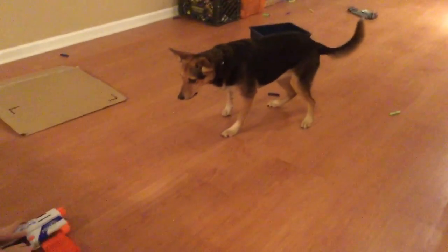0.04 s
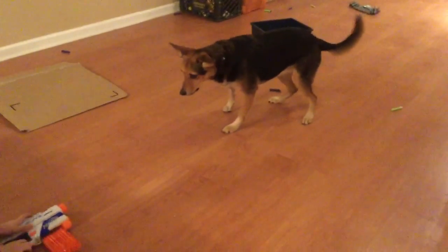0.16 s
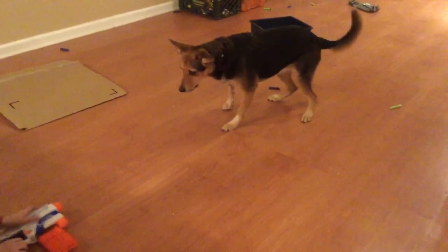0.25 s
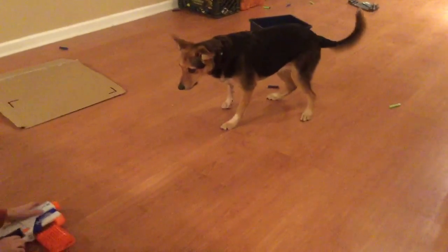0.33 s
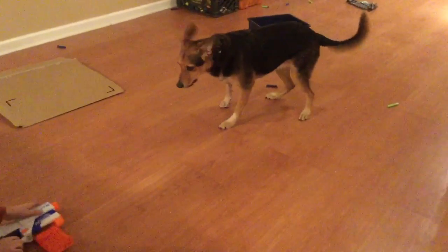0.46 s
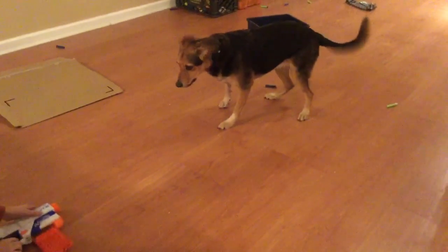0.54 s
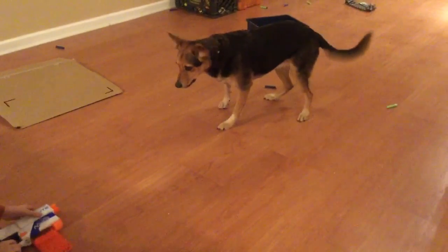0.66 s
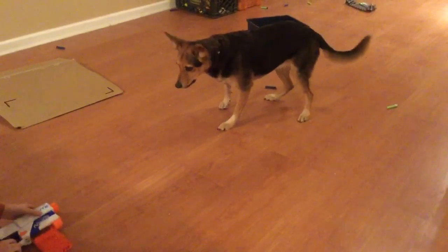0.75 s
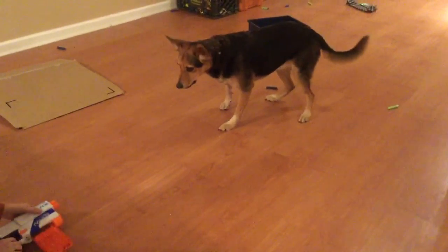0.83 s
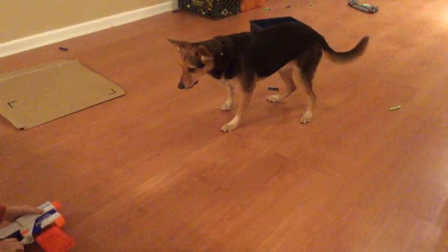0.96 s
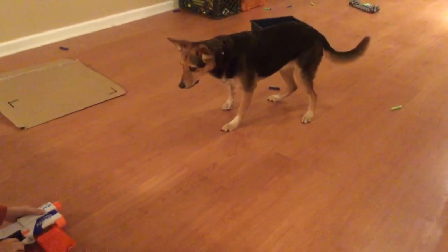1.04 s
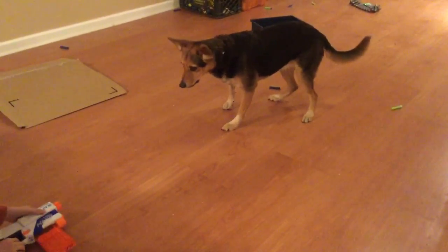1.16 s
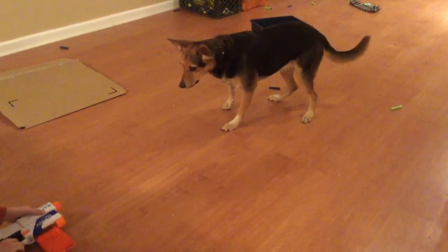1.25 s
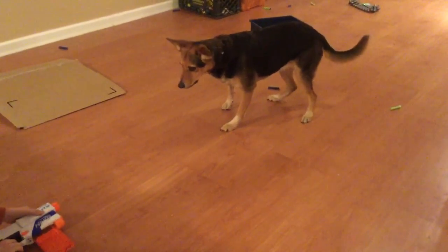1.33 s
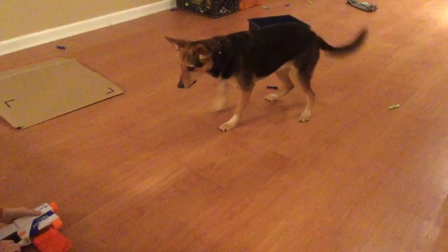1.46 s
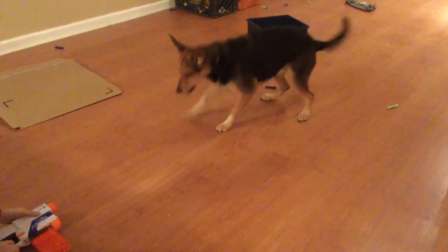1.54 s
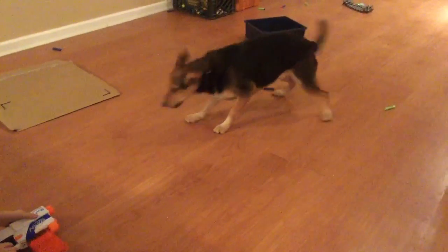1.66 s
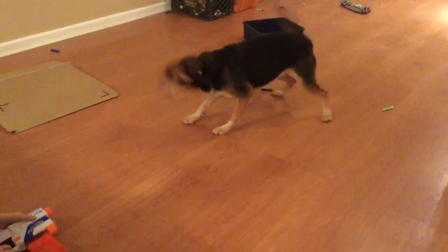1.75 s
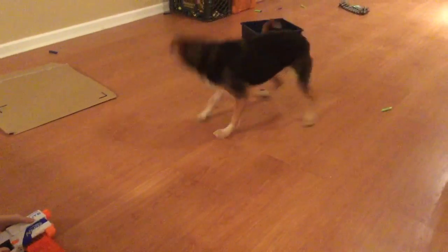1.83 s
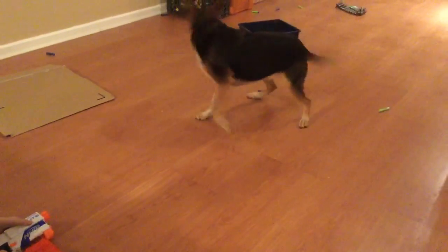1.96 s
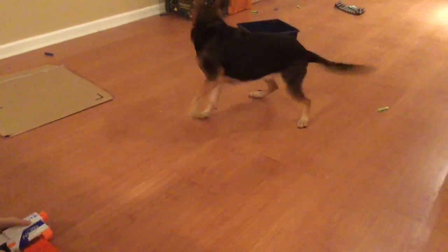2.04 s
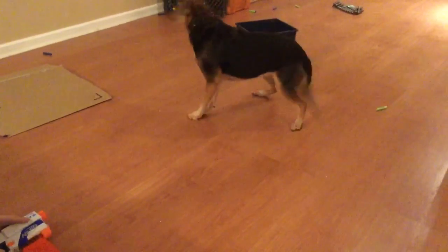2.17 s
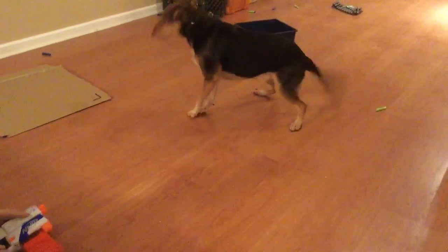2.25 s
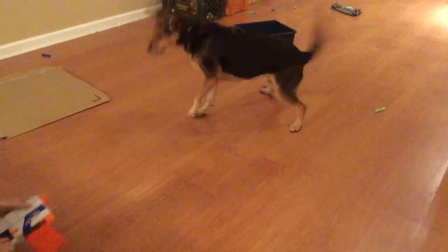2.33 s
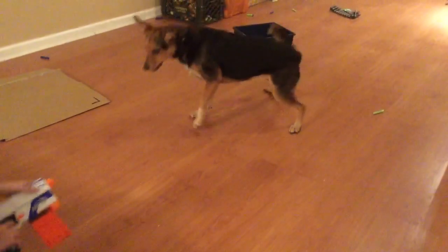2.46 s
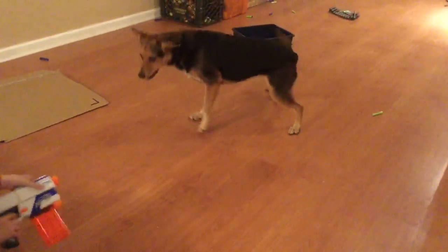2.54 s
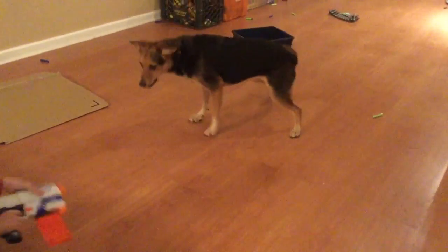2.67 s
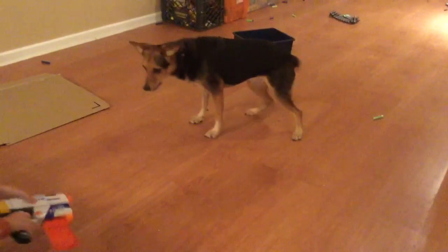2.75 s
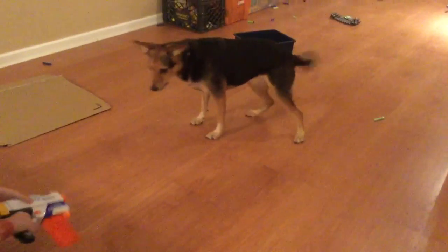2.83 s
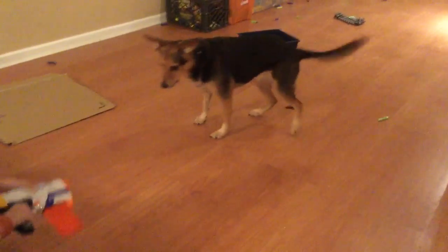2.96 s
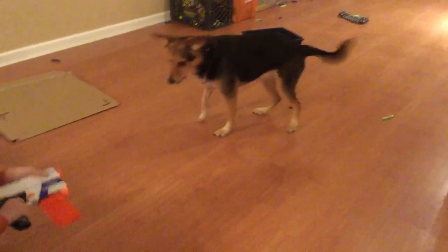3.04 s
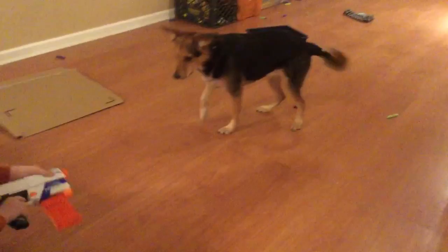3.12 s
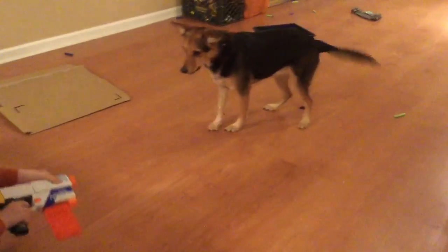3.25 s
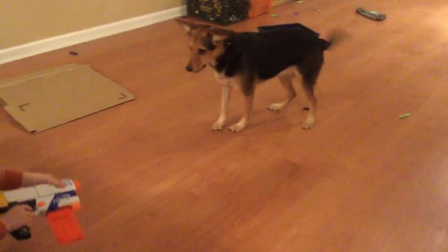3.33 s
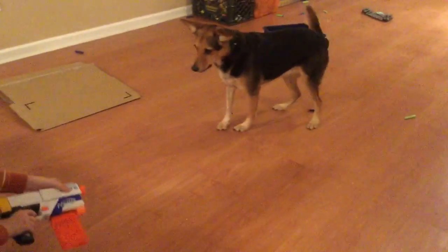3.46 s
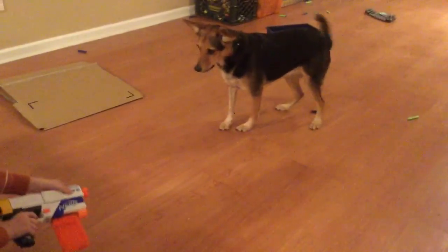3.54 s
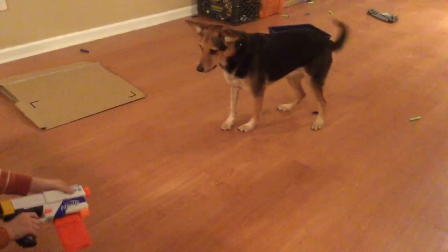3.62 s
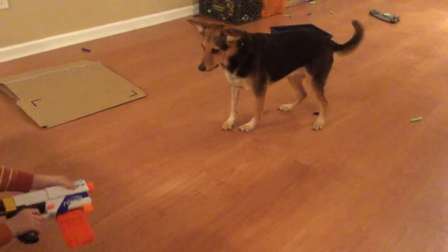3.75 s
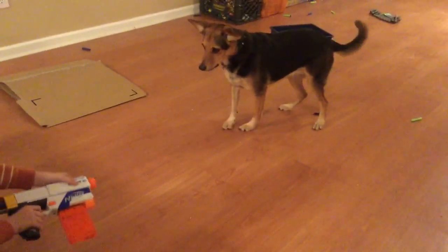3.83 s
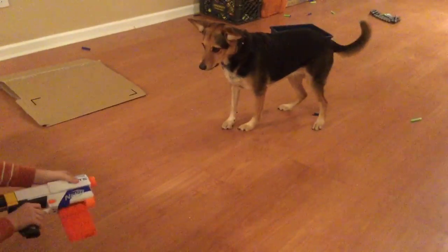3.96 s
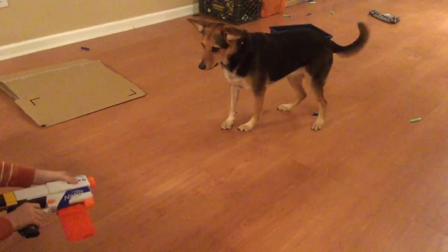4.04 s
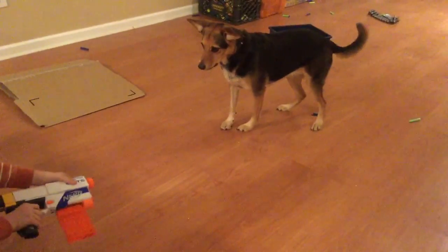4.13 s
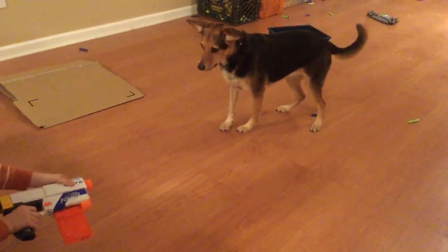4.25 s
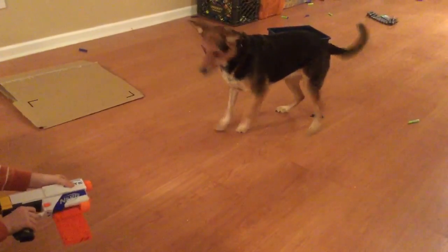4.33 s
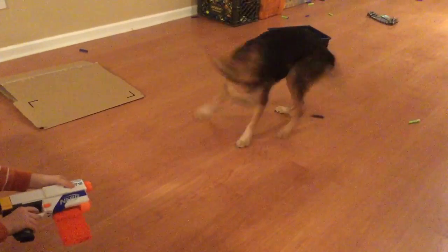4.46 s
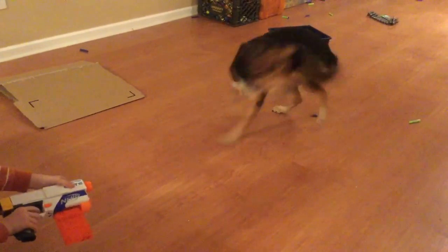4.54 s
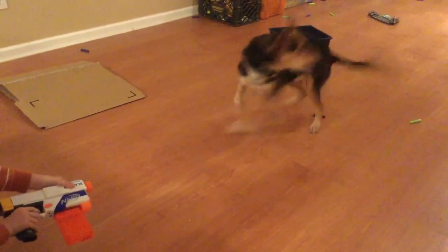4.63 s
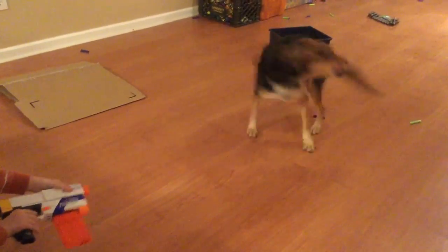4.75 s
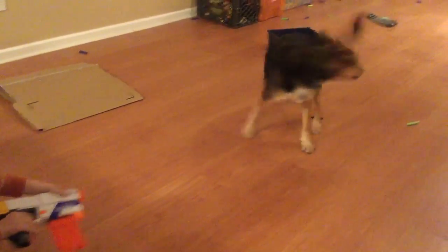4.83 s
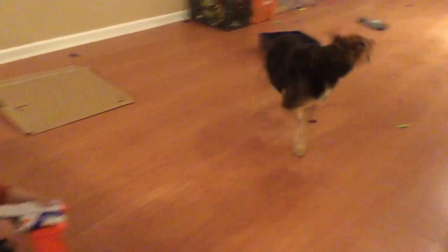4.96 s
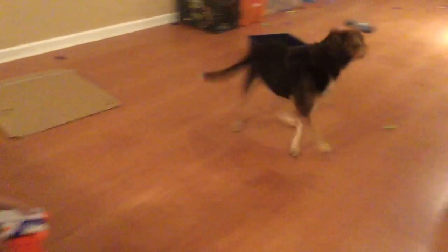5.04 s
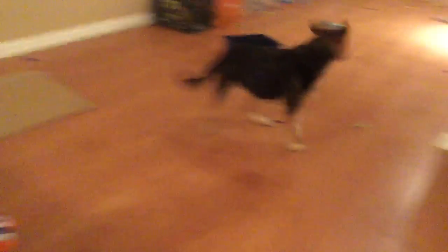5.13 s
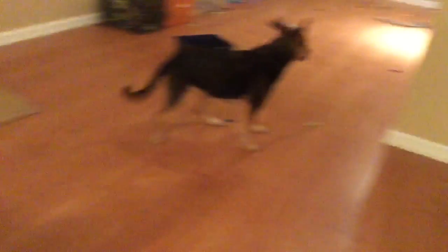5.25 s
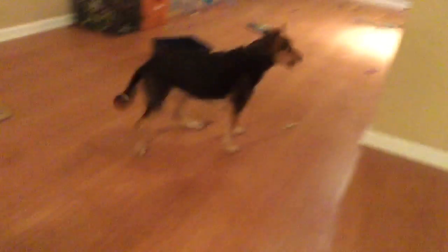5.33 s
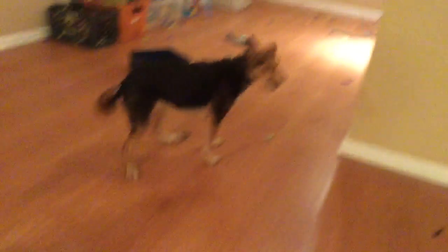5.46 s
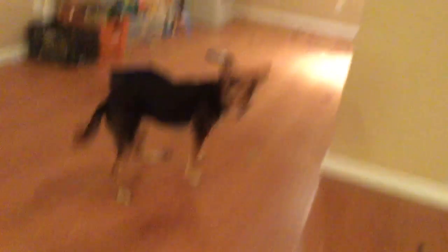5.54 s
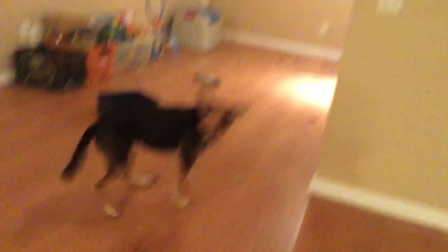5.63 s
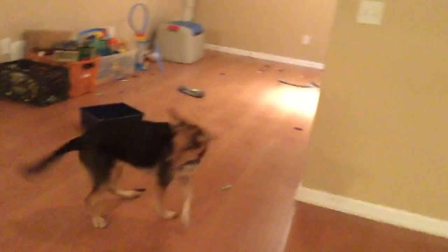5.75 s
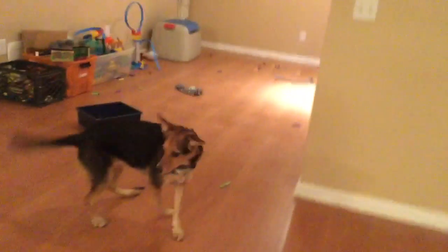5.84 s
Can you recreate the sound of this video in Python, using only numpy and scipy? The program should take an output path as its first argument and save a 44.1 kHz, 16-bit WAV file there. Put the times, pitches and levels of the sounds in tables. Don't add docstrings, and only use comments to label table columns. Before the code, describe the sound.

Near the microphone, ratchet clicks and a sliding scrape, then a hollow pop; across the room a dog answers with two rapid yelping barks. After more clattering and a quiet gap, a second, louder pop brings paw scuffs and another pair of barks, then closed-mouth huffs and claw ticks. Hard-floor reverberation, faint hiss, low rumble and handling bumps; barks slightly distorted.

```python
import sys
import numpy as np
from scipy import signal
from scipy.fft import rfft, irfft
from scipy.io import wavfile
from scipy.ndimage import uniform_filter1d

SR = 44100
rng = np.random.default_rng(int(sys.argv[2]) if len(sys.argv) > 2 else 0)


def dump(signal):
    limited = np.clip(np.atleast_2d(signal).T, -1, 1)
    pcm = np.round(limited * 32767).astype(np.int16)
    wavfile.write(sys.argv[1], SR, pcm)


def gain_from_db(level_db):
    decades = np.asarray(level_db, float) / 20
    return 10 ** decades


N = 259749
T = np.arange(N) / SR

# (t/s, level/dB, rise/s, fall/s)
MURMURS = [(0.001, -59, .01, 0.57), (.406, -58, 0.033, 0.33), (1.04, -69.5, 0.6, 0.2),
           (1.419, -70.5, 0.066, -1.5), (1.68, -43, 0.078, 1), (3.07, -51.5, 0.023, 0.12),
           (3.6, -78, .5, 0.48), (4.03, -67, 0.1, -0.9), (4.3, -54, .2, 0), (4.532, -41, 0.099, 0.23),
           (4.7, -56, 0.033, 3), (5.88, -47, 0.056, 3)]
# (t/s, level/dB, rise/s, fall/s)
DRONE = [
    (0.001, -55, .01, 0.47),
    (.65, -68, .3, 0.17),
    (1.05, -67.5, .5, .5),
]
# (t/s, level/dB, half-width/s)
BUMPS = [(.01, -46, 0.034), (.18, -70, .12), (.43, -61, 0.054), (1.488, -50, 0.048), (1.709, -46.5, 0.046),
         (1.85, -61, 0.021), (1.93, -56, 0.019), (2.24, -49, 0.018), (2.87, -71, 0.033), (3.15, -57, .04),
         (3.45, -56, 0.025), (3.52, -59, 0.041), (4.0, -70.5, .04), (4.33, -67, 0.032), (4.45, -63, 0.026),
         (4.58, -52, 0.042), (4.76, -41, 0.031), (5.07, -45.5, 0.012), (5.302, -71, 0.073),
         (5.631, -71, 0.036), (5.758, -64, 0.036)]
HAND_DB = -90.5
# (f/Hz, level/dB per Hz)
HISS = [(29, -51), (50, -28), (102, -9), (140, -19), (449, -42), (690, -43), (1040, -42), (1380, -43),
        (2500, -41), (4000, -48), (15000, -55)]
HISS_DB = -75

# (stop t/s, rise/s, low/dB, middle/dB, top/dB)
SLIDES = [(0.407, 0.16, -56, -20.5, -27), (1.738, -0.05, -65, -14.5, -18), (1.831, 0.34, -36, -72, -85),
          (2.75, 0.0946, -50, -32, -41), (2.871, 0.21, -32, -23.5, -31), (3.06, 0.17, -40, -29.5, -58),
          (3.152, 0.06, -51.5, -27, -19), (4.523, 0.147, -28, -20.5, -28), (4.681, 0.0543, -34, -20, -27),
          (4.8, 0.0169, -51, -21, -27), (1.456, .016, -29, -25, -30.5), (4.313, 0.0121, -28, -22, -34),
          (5.759, 0.2567, -33, -23.5, -26.5), (4.295, 0.75, -69, -81, -89.5)]
# (start t/s, fall/s, low/dB, middle/dB, top/dB)
SKIDS = [(0.002, 0.25, -50, -60, -75), (0.292, 0.4, -31.5, -92, -63), (1.558, 0.2, -58, -35, -44),
         (1.663, 0.33, -24, -36.5, -40.5), (1.745, 2, -42, -68, -50), (2.45, 0.44, -29.5, -52, -65),
         (2.77, 0.0046, -52, -10, -13.5), (2.851, -0.2169, -55, -53, -11),
         (3.074, 0.1269, -19.5, -23, -51.5), (4.42, 4, -54, -49, -54), (4.53, 0.7, -35.5, -29, -29.5),
         (5.2, 0.5, -27, -52, -70), (5.619, 0.24, -35, -46, -31), (5.668, 0.2, -29, -25, -23),
         (3.96, -0.36, -56, -73, -90), (5.759, 0, -19, -37, -9), (5.88, 18, -38, -30, -34)]
SLIDE_STOP_S, SKID_GRIP_S = .008, .007
GRAINS_PER_S = 450

# (t/s, peak level/dB, body/dB, length/ms)
CATCHES = [(0.1253, -36, -19, 5.6), (0.1453, -30, -14, 8.3), (0.2769, -36, -2.5, 4.2),
           (0.3202, -35.5, 5, 2.4), (0.2865, -40, -3, 2), (0.305, -42, 6, 2), (0.3267, -26.5, -8.5, 1.1),
           (0.381, -25, -11, 3), (0.421, -31, -2, 3), (0.3664, -20, -11, 4.8), (0.3993, -14.5, -13.5, 3.3),
           (0.4074, -23, -4.5, 2.9), (0.683, -43, -6, 3), (0.6996, -44, -4, 2.7), (1.036, -53.5, 0.5, 2.6),
           (2.7347, -36, -7.5, 4.3), (2.7574, -25, -16, 4.2), (2.772, -25, -8, 4), (2.785, -24, -14, 4),
           (2.834, -27, -15, 3), (2.872, -25, -8, 3), (3.152, -18, -14, 2), (2.807, -27, -8, 1.4),
           (2.823, -19, -20, 3), (2.855, -28, -10, 2.7), (2.8647, -24, -16, 1.6), (3.0145, -39, -30, 8),
           (3.047, -25.5, -14, 7.2), (3.133, -16.5, -13, 2.1), (3.1466, -13, -9.5, 4.9),
           (3.3155, -29, -30, 1.2), (3.3369, -38, -24, 1.06), (3.557, -66, -3, 2.4),
           (3.5752, -53, -12, 1.6)]
CATCH_TOP_DB = -5.5
# (t/s, peak level/dB, body/dB, top/dB, crack f/Hz)
CLAWS = [(1.6591, -18, -14.5, -4.5, 4930), (1.733, -33, -3, -24, 3500), (2.592, -50, -15, -3.5, 5500),
         (2.6364, -47.5, -14, -3, 5970), (3.787, -68, -10, -30, 1800), (3.8423, -59, -12, -25.5, 2200),
         (3.868, -74, -20, 3, 7000), (3.9569, -65, -10, -28, 2395), (4.5185, -18.5, -18, -15, 6740),
         (4.5259, -13.5, -11.5, -15, 3920), (4.6715, -13, -20, -17, 4300), (4.7853, -14, -15, -17, 5770),
         (5.303, -32.5, -26, -10, 4500), (5.615, -39, 0.5, 3, 2480), (5.6603, -38, -11, -9.5, 3580),
         (5.672, -25, -10, -12, 2620), (5.7063, -19, -18, -4, 2440), (5.725, -21, -13.5, -1, 2700),
         (5.785, -24, -13.5, -6, 5150), (5.834, -33, -11, -10, 5000)]
CLAW_MS = 1.4
CLAW_SPREAD = 1.35
# (f/Hz, level/dB, time to fall 60 dB/s)
SHELL = [(560, -4, 0.022), (795, 5, 0.0078), (1381, 19, 0.0012), (1690, 11.5, 0.0034), (2310, 0.5, 0.0099),
         (2900, 3, 0.0022)]
# (low f/Hz, high f/Hz, added share)
HOLLOWS = [(465, 700, 0.4), (860, 1150, -0.25), (1330, 1650, 0.02), (2580, 2950, 0.34), (3700, 4100, 0.13),
           (4700, 5100, 0.15), (6460, 6900, 0.028)]

# (t/s, centre f/Hz, level/dB,
# rise/s, fall/s)
SWISHES = [(1.73, 3600, -42.5, .06, 0.46), (4.23, 2500, -70, 0.4, .5), (4.56, 3800, -33.5, 0.023, 0.22),
           (4.68, 3800, -46, .01, 0.4), (5.01, 4800, -41.5, .12, 0.2), (2.72, 4300, -45, 0.091, 0.15),
           (2.68, 6500, -52, .04, 0.2), (2.83, 2100, -38, .15, .12), (0.41, 2800, -38, .02, .12),
           (2.195, 5500, -46, .02, .05), (4.79, 3000, -42, .08, .1), (.165, 1800, -38.5, 0.024, 0.04),
           (.684, 1670, -47, .004, 0.01), (3.118, 7300, -38, .003, .012),
           (3.053, 11000, -36.5, .003, -0.0056), (.95, 560, -66, .2, .2), (4.2, 1500, -79, .3, .4),
           (3.17, 800, -29, .02, 0.1049), (1.44, 1500, -62, .01, .1), (5.27, 2700, -51.5, .05, 0.7),
           (5.42, 3300, -49.5, 0.24, .4), (5.38, 5600, -53, .15, .3), (5.56, 6100, -56, 0.17, -9),
           (5.79, 5700, -34, 0.13, 0.05)]
SWISH_SPREAD = 1.18

# (t/s, peak level/dB, body/dB, top/dB, length/ms)
POPS = [
    (1.4545, -30.5, 1.5, 5, 1.9),
    (1.4598, -18, 5.5, -10, 5.6),
    (1.4675, -24, 2.5, 1.5, 2.95),
    (4.3095, -26.5, 0.5, 3, 2.67),
    (4.3138, -12, -4, -9, 8.9),
    (4.3225, -24.5, 7, 7.5, 2.2),
]
# (f/Hz, level/dB, time to fall 60 dB/s)
BARREL = [(106.9, -2.5, 0.0039), (179, -1.5, 0.01503), (260, 1.5, 0.015), (400, -3, 0.0011),
          (560, -6, 0.049), (724, 1, 0.015), (1066, 12.5, 0.0057), (1475, 9.5, 0.0068), (1900, 3, 0.0035),
          (2420, -3.5, 0.0027)]

# (t/s, pitch f/Hz, level/dB, gape: lift of the
# overtones/dB)
BARKS = [
    [(1.818, 200, -45, -8), (1.84, 388.2, -22.5, 3.5), (1.87, 565, -8, -0.5), (1.905, 670, -14, 4),
     (1.955, 728, -10, 8), (1.975, 600, -16, -8.5), (1.998, 560, -38, -6), (2.007, 570, -10, -8),
     (2.035, 450, -45, -9.5)],
    [(2.13, 154.7, -40.5, -9), (2.165, 352.8, -28.5, -1), (2.182, 490, -9, 3), (2.212, 650, -15, 8),
     (2.242, 686.2, -11, 4), (2.258, 687.2, -14, 13), (2.275, 600, -19, 0.5), (2.31, 470, -17, -8),
     (2.345, 180, -55, -1)],
    [(4.705, 260, -37, -17), (4.725, 410, -17, 3.5), (4.755, 610, -7, -3), (4.8, 712, -12, -1.5),
     (4.835, 650, -19, 0), (4.86, 496, -20, -5.5), (4.89, 381, -35, -15.5), (4.94, 226, -31, -19),
     (4.985, 225, -22, -22)],
    [(4.966, 195.5, -45, 3), (5.003, 440, -17, 4), (5.02, 560, -20, 0), (5.047, 665, -11, 3),
     (5.085, 685, -10, 1), (5.105, 645, -17, 6), (5.128, 400, -19, -1), (5.17, 220, -30, -10),
     (5.265, 143, -34, -13)],]
HOARSENESS = [
    (.26, .55),
    (.18, .4),
    (.14, .6),
    (.05, .3),
]
SLACK_ROUGH = 0.6
# (f/Hz, level/dB)
THROAT = [(150, -4), (400, -2.5), (560, 10), (700, 1), (820, 5), (980, 9.5), (1150, -5.5), (1380, 2),
          (1620, 2), (1900, -7), (2150, -34.5), (2700, -30.5), (3450, -33.5), (4700, -49), (6100, -38.5),
          (7500, -56)]
# (f/Hz, level/dB per Hz)
BREATH = [(150, -26), (500, -13), (1000, -5), (1600, -10), (1950, -6), (2400, -25), (4300, -25),
          (5200, -21.5), (6200, -24), (7200, -29), (9000, -29), (15000, -29)]
BREATH_DB, HALF_DB = -9, -9
CLOSING_DB = 14
OVERTONE_PHASE = .7
SINUS_LOW_HZ, SINUS_HIGH_HZ, SINUS_SHARE = 2120, 2450, .85

# (start t/s, length/s, level/dB)
RASPS = [
    (1.845, 0.19, -46),
    (2.18, 0.14, -45),
    (4.725, 0.11, -63),
    (5.016, 0.18, -67),
]
RASP_FROM_HZ, RASP_TO_HZ, RASP_WIDTH_HZ = 5200, 6900, 450

# (t/s, pitch f/Hz, level/dB)
HUFFS = [
    [(5.25, 298, -29.5), (5.272, 436, -25), (5.292, 350, -24), (5.31, 290, -36), (5.35, 314, -44),
     (5.41, 260, -45), (5.45, 241.6, -64)],
    [(5.46, 307, -44), (5.5, 300.4, -47), (5.57, 355.3, -61), (5.6, 340, -32.5), (5.625, 309, -46),
     (5.68, 268, -40), (5.7, 242, -85)],
]
# (f/Hz, level/dB)
MUZZLE = [(150, 11), (350, 38), (520, -19), (900, -34), (4600, -73)]
HUFF_ROUGH = 0.15

# (f/Hz, time to fall 60 dB/s)
ROOM_T60 = [(90, 0.29), (250, 0.44), (600, 0.34), (900, 0.33), (1300, 0.44), (3000, 0.48), (6000, 0.45),
            (12000, 0.28)]
# (delay/s, level/dB)
ECHOES = [
    (.0031, -16),
    (.0113, -8.5),
    (.0187, -20),
    (.0309, -9.5),
]
DOG_ROOM_DB, TOY_ROOM_DB, POP_ROOM_DB = -3, -1, -2
# (f/Hz, level/dB, time to fall 60 dB/s)
SYMPATHY = [(705, -70, 0.6), (1340, -66, 0.2), (1368, -65, .9), (1296, -60, 0.4), (1225, -65, .5),
            (1424, -72.5, 0.31), (1062, -61, .7), (1540, -63.5, .7), (1915, -62, .3), (1445, -72, .4),
            (2680, -50, 0.26), (3450, -54, 0.31)]
# (f/Hz, level/dB, time to fall 60 dB/s)
HIGH_RINGS = [(3375, -37, .5), (3310, -41, .3), (2710, -45, .3)]
# (t/s, level/dB, rise/s, fall/s)
MUZZLE_UP = (2.27, 0, .1, .25)

CALL, KNOCK = 20000, 8000
CUTOFF_HZ = 16350


def rms_one(x):
    return x / np.sqrt(np.mean(x ** 2) + 1e-20)


def at_hz(points, hz):
    table = np.array(points)
    return np.interp(np.log(hz), np.log(table[:, 0]), table[:, 1])


def band(x, low_hz, high_hz):
    return signal.sosfilt(signal.butter(2, [low_hz, high_hz], "band", fs=SR, output="sos"), x)


def noise(low_hz, high_hz, size):
    once = band(rng.standard_normal(size), low_hz, high_hz)
    return rms_one(band(once, low_hz, high_hz))


def coloured(spectrum, size):
    hz = np.maximum(np.arange(size // 2 + 1) * SR / size, 20)
    white = rfft(rng.standard_normal(size))
    return rms_one(irfft(white * gain_from_db(at_hz(spectrum, hz)), size))


def ring(x, modes):
    out = 0
    for hz, level_db, t60 in modes:
        r = gain_from_db(-60 / (t60 * SR))
        w = 2 * np.pi * hz / SR
        out = out + gain_from_db(level_db) * signal.lfilter([0, np.sin(w)], [1, -2 * r * np.cos(w), r * r], x)
    return out


def swell(s, level_db, rise_s, fall_s):
    rise, fall = max(rise_s, .002), max(fall_s, .002)
    gain = np.zeros(N)
    a, b = int(max(s - 6 * rise, 0) * SR), int((s + 6 * fall) * SR)
    since = T[a:b] - s
    gain[a:b] = gain_from_db(level_db + 20 * np.where(since < 0, since / rise, -since / fall))
    return gain


def background():
    push = gain_from_db(HAND_DB) + sum(gain_from_db(db) * np.exp(-((T - s) / width) ** 2) for s, db, width in BUMPS)
    hand = push * noise(29, 80, N)
    murmur = sum(swell(*row) for row in MURMURS) * noise(130, 360, N)
    drone = sum(swell(*row) for row in DRONE) * noise(70, 140, N)
    hiss = gain_from_db(HISS_DB) * coloured(HISS, N)
    return hand + murmur + drone + hiss


def scuffs():
    hits = rng.random(N) < GRAINS_PER_S / SR
    strength = gain_from_db(3.5 * np.minimum(rng.exponential(1, N), 3.5))
    grains = hits * strength * rng.choice([-1, 1], N)
    rub = rms_one(grains) + .7 * rng.standard_normal(N)
    rub = rub * gain_from_db(3 * noise(25, 80, N))
    parts = [rms_one(band(rub, lo, hi)) for lo, hi in [(480, 1600), (2000, 6800), (4700, 16000)]]
    strokes = [(s, rise, SLIDE_STOP_S, levels) for s, rise, *levels in SLIDES]
    strokes += [(s, SKID_GRIP_S, fall, levels) for s, fall, *levels in SKIDS]
    gains = np.array([swell(s, -15.5, rise, fall) for s, rise, fall, _ in strokes])
    levels = gain_from_db(np.array([row[-1] for row in strokes]))
    return np.sum(levels.T @ gains * parts, axis=0)


def knocks(events, body, body_db):
    out, t = np.zeros((2, N + KNOCK)), T[:KNOCK]
    for s, level_db, low_db, top_db, ms, *crack_hz in events:
        width = ms / 1000
        burst = rng.standard_normal((3, KNOCK))
        burst = burst * np.exp(-t / width) * (1 - np.exp(-1.5 * t / width))
        click = np.sqrt(np.sum(burst ** 2, axis=1, keepdims=True)) * (t == 0)
        burst = np.stack([burst, click], axis=1)
        crack = band(burst[0], *(crack_hz or (1200, 6800)))
        parts = [crack, band(burst[1], 6000, 14000), ring(burst[2], body)]
        levels = [0, top_db + 4.0, low_db + body_db]
        a = int(s * SR)
        knock = sum(gain_from_db(db) * p / np.abs(p[0]).max() for p, db in zip(parts, levels))
        out[:, a:a + KNOCK] += gain_from_db(level_db) * knock
    return out[:, :N]


def ticks():
    rows = [(s, db, body, CATCH_TOP_DB, ms) for s, db, body, ms in CATCHES]
    rows += [(s, db, body, top, CLAW_MS, hz / CLAW_SPREAD, hz * CLAW_SPREAD)
             for s, db, body, top, hz in CLAWS]
    return knocks(rows, SHELL, body_db=10.5)


def hollow(x):
    return x + sum(share * band(x, low_hz, high_hz) for low_hz, high_hz, share in HOLLOWS)


def swishes():
    air = rng.standard_normal(N) * gain_from_db(1.5 * noise(20, 90, N))
    out = np.zeros(N)
    for s, hz, db, rise, fall in SWISHES:
        out += swell(s, db, rise, fall) * rms_one(band(air, hz / SWISH_SPREAD, hz * SWISH_SPREAD))
    return out


def pops():
    return knocks(POPS, BARREL, body_db=10.5) * gain_from_db(np.array([[0], [POP_ROOM_DB]]))


def voice(calls, tract, breath_db):
    out = np.zeros(N)
    k = np.arange(1, 49)[:, None] / 2
    for rows in calls:
        s, hz, level_db, rough, gape_db = np.transpose(rows)
        a = int(s[0] * SR)
        t = T[a:int(s[-1] * SR)]
        jitter = noise(8.5, 170, CALL)[:len(t)]
        shimmer = noise(30.6, 222, CALL)[:len(t)]
        breath = coloured(BREATH, CALL)[:len(t)]
        rough = np.clip(np.interp(t, s, rough), 0, 1)
        glide = uniform_filter1d(np.interp(t, s, hz), size=500, mode="nearest")
        pitch = glide * (1 + 0.065 * rough * jitter)
        phase = np.cumsum(pitch) * 2 * np.pi / SR

        gains = gain_from_db(at_hz(tract, k * pitch)) * (k * pitch < tract[-1][0])
        gape = np.interp(t, s, gape_db)
        gains *= gain_from_db(gape * np.clip(k - 1, 0, np.where(gape < 0, 3, 1)))
        shut = np.clip(-gape / CLOSING_DB, 0, 1)
        gains[::2] *= gain_from_db(HALF_DB) * rough
        gains /= np.sqrt(np.sum(gains ** 2, axis=0) / 2)

        tone = np.sum(gains * np.sin(k * phase + OVERTONE_PHASE * k ** 2), axis=0)
        tone = tone * (1 + 1.104 * rough * shimmer)
        puffs = gain_from_db(breath_db) * (0.062 + rough) * (1 - shut)
        puffs = puffs * (1 + 0.4 * np.cos(phase)) * breath
        loudness = gain_from_db(np.interp(t, s, level_db)) * signal.windows.tukey(len(t), .06)
        out[a:a + len(t)] += loudness * (tone + puffs)
    return out


def barks():
    calls = []
    for rows, (hoarse, slack) in zip(BARKS, HOARSENESS):
        top_s, top_hz, *_ = max(rows, key=lambda row: row[1])
        call = []
        for s, hz, db, gape in rows:
            extra = slack if s < top_s else SLACK_ROUGH
            call.append((s, hz, db, hoarse + extra * (1 - hz / top_hz), gape))
        calls.append(call)
    return voice(calls, THROAT, BREATH_DB)


def rasps():
    out = np.zeros(N)
    for s, length, level_db in RASPS:
        share = np.clip((T - s) / length, 0, 1)
        hz = RASP_FROM_HZ + (RASP_TO_HZ - RASP_FROM_HZ) * share
        carrier = np.sin(np.cumsum(hz) * 2 * np.pi / SR)
        out += gain_from_db(level_db) * np.sin(np.pi * share) ** .5 * carrier * (share < 1)
    patches = gain_from_db(3.0 * noise(15, 40, N))
    return out * noise(19, RASP_WIDTH_HZ, N) * patches


def huffs():
    calls = [[(s, hz, db, HUFF_ROUGH, 0) for s, hz, db in rows] for rows in HUFFS]
    return voice(calls, MUZZLE, breath_db=-29)


def room(direct, spread, wet_db, echo_db, low_hz):
    t = T[:SR]
    edges = 60 * 2 ** np.arange(0, 8.1, .5)
    white = rng.standard_normal((2, SR))
    tail = np.zeros(SR)
    for k, (lo, hi) in enumerate(zip(edges, edges[1:])):
        tail += band(white[k % 2], lo, hi) * gain_from_db(-60 * t / at_hz(ROOM_T60, np.sqrt(lo * hi)))
    tail *= 1 - np.exp(-t / 0.00067)
    tail = gain_from_db(wet_db) * tail / np.sqrt(np.sum(tail ** 2))
    heard = direct + signal.fftconvolve(spread, tail)[:N]
    for s, db in ECHOES:
        delay = int(s * SR)
        heard[delay:] += gain_from_db(db + echo_db) * direct[:-delay]
    return signal.sosfilt(signal.butter(N=4, Wn=low_hz, btype="high", fs=SR, output="sos"), heard)


def scene():
    clatter = hollow(band(ticks() + scuffs(), 410, 19000))
    toy = pops() + clatter
    dog = barks() + huffs()
    dog = dog - SINUS_SHARE * band(dog, SINUS_LOW_HZ, SINUS_HIGH_HZ) + rasps()
    heard = room(dog, dog, DOG_ROOM_DB, echo_db=-2.5, low_hz=123)
    heard += ring(dog, SYMPATHY) + ring(dog * swell(*MUZZLE_UP), HIGH_RINGS)
    heard += room(*toy, TOY_ROOM_DB, echo_db=-3.0, low_hz=95.0)
    return (heard + background() + swishes())[None]


def low_pass(x):
    return signal.sosfilt(signal.butter(12, 16320, fs=SR, output="sos"), x)


def record(dry):
    x = dry / (1 + np.abs(dry) ** 8) ** (1 / 8)
    x = signal.sosfilt(signal.cheby2(8, 50, CUTOFF_HZ, fs=SR, output="sos"), x)
    return low_pass(x)


dry = scene()
out = record(dry)
dump(out)
```